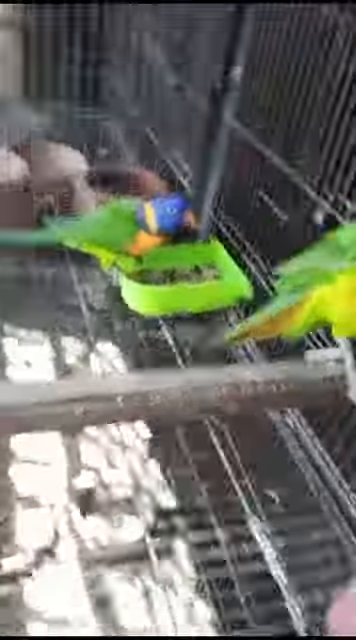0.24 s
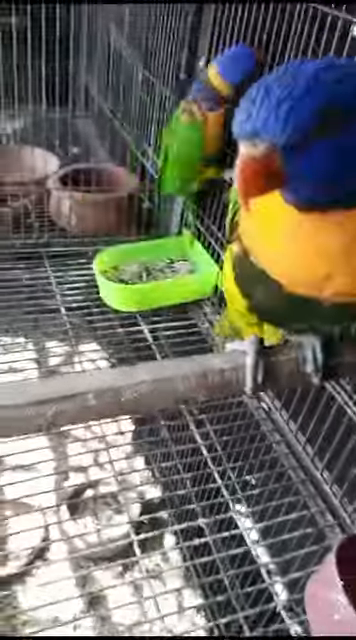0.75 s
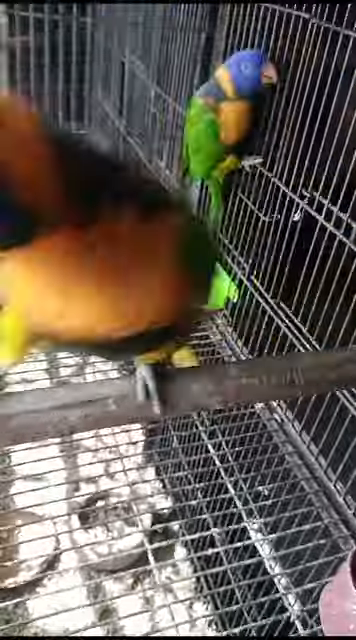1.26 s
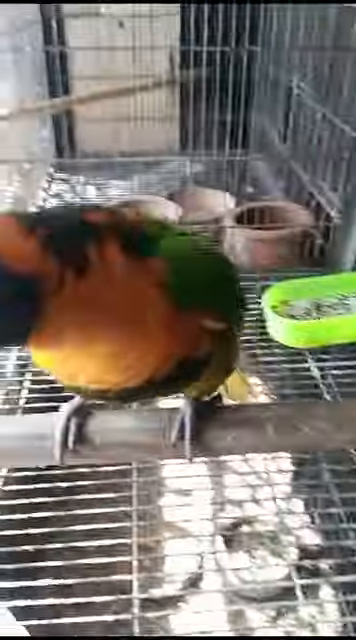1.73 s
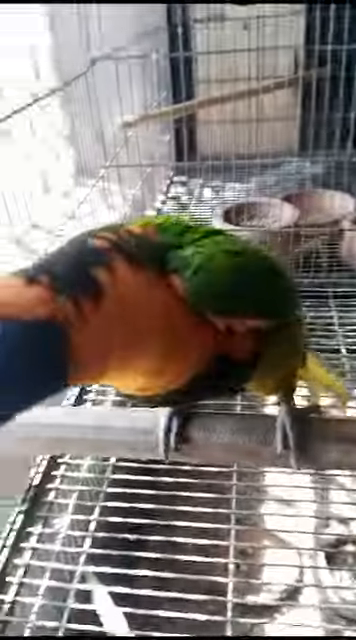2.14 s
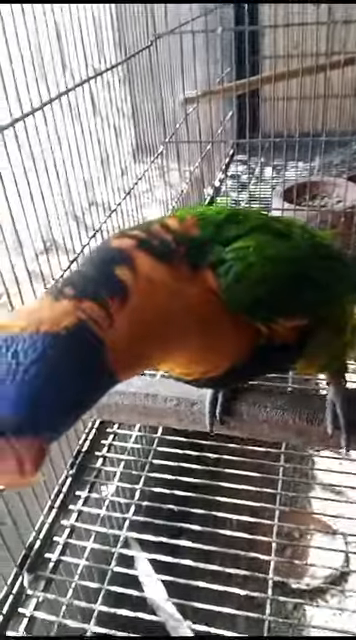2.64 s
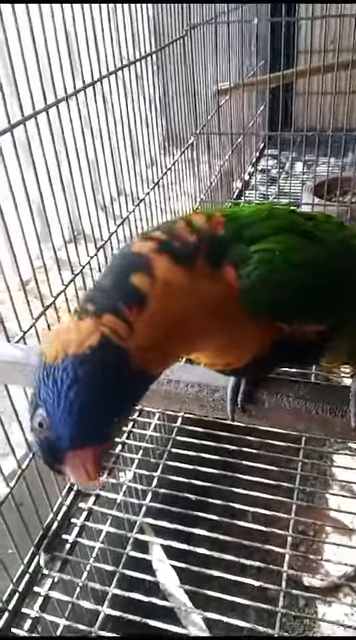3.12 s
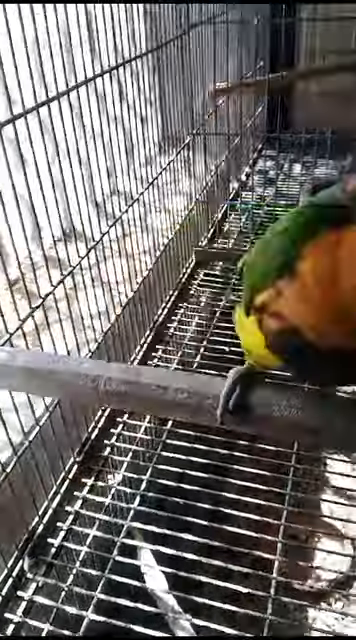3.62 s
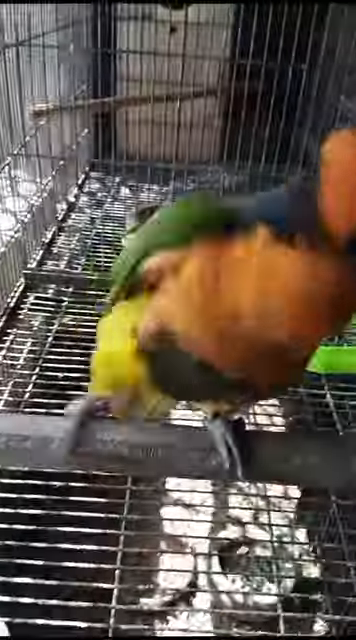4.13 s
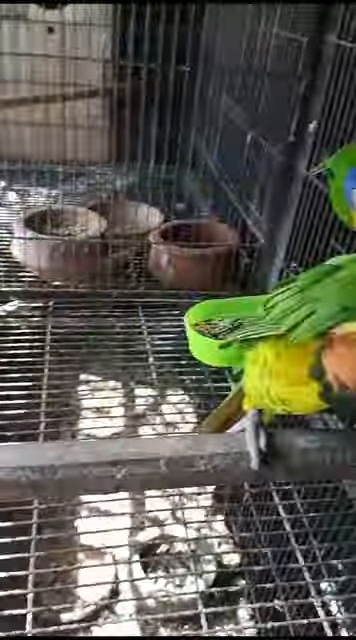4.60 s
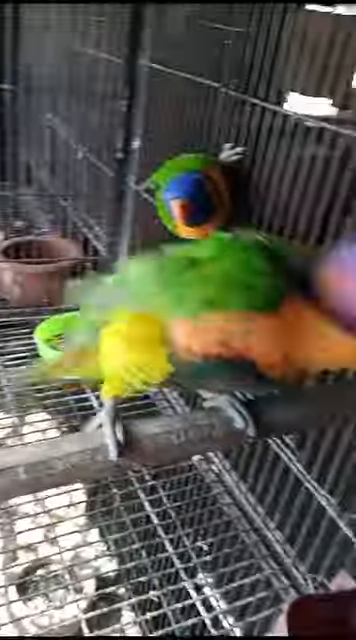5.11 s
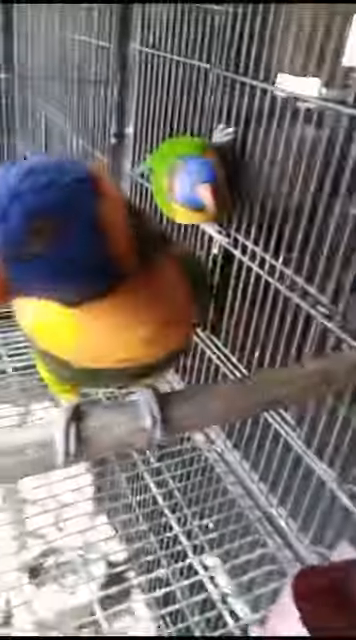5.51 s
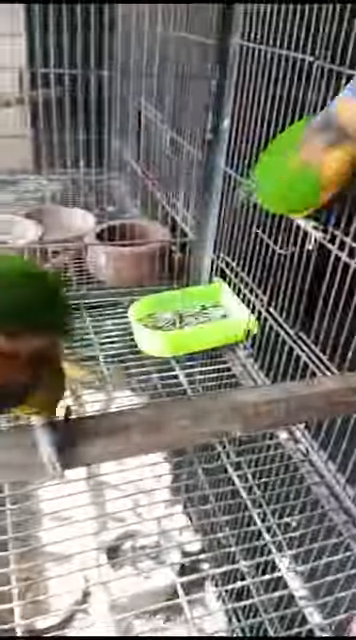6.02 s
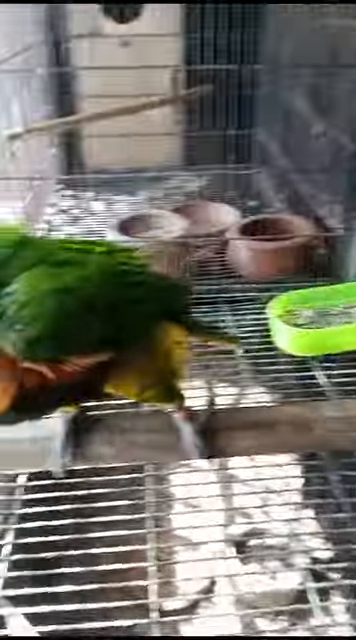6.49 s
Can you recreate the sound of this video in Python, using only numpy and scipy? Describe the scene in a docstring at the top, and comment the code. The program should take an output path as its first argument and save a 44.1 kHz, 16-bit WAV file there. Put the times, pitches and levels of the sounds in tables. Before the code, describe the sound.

Two close parrot voices, one lower and one higher, trade hoarse, fluttering squawks in a cage inside a hard-walled shed. Two piercing held whistles stand out early, the second followed by a run of short dry chirps. The squawking carries on, joined later by clear falling notes. Soft rustles of wings and feet, far-off birds and faint outdoor air lie underneath.

```python
"""Small parrots in a wire cage

Close to a phone: clear whistles (near-pure tones), rasping squawks from a low and a high voice
(fluttering harmonic stacks) and short dry chips. Wings and feet rustle on the wires; distant birds
call over faint yard air. A hard shed answers briefly; loud whistles overload the microphone."""
import sys
import numpy as np
from scipy import signal
from scipy.fft import rfft, irfft, next_fast_len
from scipy.io import wavfile
from scipy.ndimage import uniform_filter1d

SR = 44100
rng = np.random.default_rng(int(sys.argv[2]) if len(sys.argv) > 2 else 0)


def unload_audio(sound):
    """Save the sound as a 16-bit wav file, at the path given as the first command line argument."""
    columns = np.transpose(np.atleast_2d(sound))
    # keep every value between -1 and 1, then stretch to whole-number steps
    steps = np.round(np.clip(columns, -1, 1) * 32767)
    wavfile.write(sys.argv[1], SR, steps.astype(np.int16))


N = 297675
TOP_HZ = 15830


def amp(db):
    """dB to gain."""
    return 10 ** (np.asarray(db) / 20)


def unit(x):
    """Scale to rms 1."""
    return x / np.sqrt(np.mean(np.abs(x) ** 2) + 1e-20)


def along(points, hz):
    """Interpolate (freq_hz, value) points on a log axis."""
    freq_hz, values = np.transpose(points)
    return np.interp(np.log(hz + 1), np.log(freq_hz + 1), values)


def filtered(x, response):
    """Zero-phase filter with gain response(hz)."""
    size = next_fast_len(N + 8192)
    return irfft(rfft(x, size) * response(np.fft.rfftfreq(size, 1 / SR)), size)[..., :N]


def noise(spectrum):
    """Noise of rms 1 shaped by (freq_hz, gain_db) points."""
    return unit(filtered(rng.standard_normal(N), lambda f: amp(along(spectrum, f))))


def flutter(n, width_hz):
    """Complex low-pass noise, rms about 1."""
    hz = np.fft.fftfreq(next_fast_len(n + SR // 4), 1 / SR)
    white = rng.standard_normal(len(hz)) + 1j * rng.standard_normal(len(hz))
    return unit(np.fft.ifft(white / (1 + (hz / width_hz) ** 2) ** 2))[:n]


def contours(rows, edge_s):
    """(time_s, values...) rows to sample indices, edge fade and one smoothed curve per value."""
    time_s, *columns = np.transpose(rows)
    i = np.arange(max(round(time_s[0] * SR), 0), min(round(time_s[-1] * SR), N))
    fade = np.clip(np.minimum(i - i[0] + 1, i[-1] - i + 1) / (edge_s * SR), 0, 1)
    curves = [uniform_filter1d(np.interp(i / SR, time_s, c), size=440, mode="nearest") for c in columns]
    return i, fade, curves


def yard_air(level_db=-69, waver_db=4):
    """Distant flock and yard: faint wavering noise."""
    # freq_hz, gain_db
    spectrum = [(30, -18), (130, 0), (300, -4), (800, -14), (1500, -15), (3000, -13), (5000, -19),
                (8000, -36), (16000, -48)]
    return noise(spectrum) * amp(level_db + waver_db * flutter(N, 6).real)


def whistles(calls, step_db, slope_db, membrane_db, waver, membrane_hz=500):
    """Eight wavering partials; a slow second membrane adds sidebands to loud, high notes."""
    out = np.zeros(N)
    for rows in calls:  # time_s, pitch_hz, partial1_db, partial2_db, partial3_db
        i, fade, (hz, *levels_db) = contours(rows, edge_s=0.0027)
        phase = 2 * np.pi * np.cumsum(hz) / SR
        levels_db += [levels_db[2] + step_db + slope_db * k for k in range(5)]
        gate = np.clip((levels_db[1] + 17.5) / 6, 0, 1) * (hz > 2900)
        depth = gate * amp(membrane_db) * (1 + flutter(len(i), 12).real)
        membrane = depth * np.sin(2 * np.pi * membrane_hz * i / SR + 2.4 * flutter(len(i), 40).real)
        out[i] += fade * membrane * amp(levels_db[0] - 1)  # its own faint tone
        for k, db in enumerate(levels_db, 1):
            tone = (1 + waver * flutter(len(i), 38)) * np.exp(1j * k * phase)
            out[i] += np.sqrt(2) * fade * (1 + 2 * membrane) * amp(db) * tone.real * (k * hz < TOP_HZ)
    return out


def high_whistles(settle_s=0.026, held_db=(1, 5.5, -9.5), swell_db=(0, 4, -2)):
    """Upward swoop, loud held note and its faint echo in the shed; held_db, swell_db per partial."""
    # top_s, hold_end_s, top_hz, hold_first_hz, hold_last_hz, level_db, third_offset_db, echo_offset_db
    notes = [(0.062, .223, 3298, 3020, 2996, -22, 5, 5.1),
             (1.89, 2.081, 3200, 3008, 2927, -15.5, -3.5, -5.5)]
    # from_top_s, pitch_ratio, partial1_db, partial2_db, partial3_db (re note level)
    swoop = [(-.075, 0.56, -14.5, -16.5, -42.5), (-.038, 0.61, -4, -4.5, -19.5),
             (-.022, 0.8, -17.5, -13.5, -18), (-.011, .93, -7.5, 11, -27.5), (0, 0.97, 3.5, -1, -15)]
    # from_hold_end_s, partial1_db, partial2_db, partial3_db (re note level plus echo offset)
    echo_tail = [(.018, -17, -16, -50), (.055, -6.5, -8, -40.5), (.13, -17, -33.5, -66),
                 (.18, -53, -40, -80)]
    calls = []
    for top_s, end_s, top_hz, first_hz, last_hz, db, third_db, echo_db in notes:
        hold_db = db + np.add(held_db, [0, 0, third_db])
        rows = [(top_s + s, ratio * top_hz, *np.add(db, levels)) for s, ratio, *levels in swoop]
        rows += [(top_s + settle_s, first_hz, *hold_db), (end_s, last_hz, *(hold_db + swell_db))]
        rows += [(end_s + s, last_hz, *np.add(db + echo_db, levels)) for s, *levels in echo_tail]
        calls.append(rows)
    return whistles(calls, step_db=0, slope_db=-5.5, membrane_db=-24, waver=0.37)


def syllable(start_s, rise_s, length_s, first_hz, top_hz, last_hz, arch,
             peak_db, fade_db, peak_rasp, last_rasp, tilt_db_oct):
    """Hoarse scoop to top_hz, then a fading glide to last_hz; arch over 1 bends the pitch late."""
    attack_db, onset_rasp, hoarse_share = 15.5, 0.7, 0.37
    scoop = [(start_s + v * rise_s, first_hz + v * (top_hz - first_hz),
              peak_db - (1 - v ** 2) * attack_db, onset_rasp, tilt_db_oct) for v in (0, hoarse_share)]
    u = np.linspace(0, 1, num=8)
    time_s = start_s + rise_s + u * (length_s - rise_s)
    hz = top_hz + u ** arch * (last_hz - top_hz)
    db = peak_db - fade_db * u ** 1.58
    rasp = peak_rasp + (last_rasp - peak_rasp) * u ** 1.32
    return scoop + list(zip(time_s, hz, db, rasp, np.full_like(u, tilt_db_oct)))


def break_up(x, patchy_db):
    """The voice breaks up: random gain patches, about 500 Hz by 50 ms."""
    spectra = signal.stft(x, nperseg=512)[2]
    patches = uniform_filter1d(rng.standard_normal(spectra.shape), size=6, axis=0)
    patches = uniform_filter1d(patches, size=9, axis=1)
    return signal.istft(spectra * amp(patchy_db * unit(patches)), nperseg=512)[1][:N]


def squawks(syllables, throat, flutter_hz, tremble, jitter, jitter_hz, growl_db, patchy_db, steady=0.84):
    """Partials flutter, the higher the wilder; rasp shifts power to a torn stack with half-pitch growl."""
    out, harmonics = np.zeros(N), np.arange(1, 12)
    for row in syllables:
        i, fade, (hz, db, rasp, tilt_db_oct) = contours(syllable(*row), edge_s=0.0044)
        rasp = np.clip(rasp, 0, 1)
        wander = flutter(len(i), jitter_hz)
        pitch_ratios = 1 + np.array([tremble * np.sqrt(rasp) * wander.real, jitter * wander.imag])
        even, torn = np.exp(1j * np.pi * np.cumsum(hz * pitch_ratios, axis=1) / SR)  # half-pitch phasors
        tilt_db = tilt_db_oct * np.log2(harmonics[:, None])
        power = np.sum(amp(2 * (along(throat, harmonics[:, None] * hz) + tilt_db)), axis=0)
        for k in harmonics:
            shimmer = (steady / k + flutter(len(i), flutter_hz * k ** 0.62)) / np.hypot(1, steady / k)
            growl = rasp * amp(growl_db) * flutter(len(i), 420) * torn ** (2 * k - 1)
            hoarse = flutter(len(i), 200) * torn ** (2 * k) + growl
            partial = np.sqrt(1 - rasp ** 2) * shimmer * even ** (2 * k) + rasp * hoarse
            in_band = k * hz < SR / 2 - 3000
            out[i] += np.sqrt(2 / power) * fade * amp(db + tilt_db[k - 1]) * in_band * partial.real
    return break_up(filtered(out, lambda f: amp(along(throat, f))), patchy_db)


def far_voice():
    """Faint, distant squawks: some bright and hissy near 7 kHz, one dull."""
    # columns: arguments of syllable()
    syllables = [ (.265, 0.012, 0.19, 2437, 2403, 2337, .52, -37, 25, 0.39, 0.22, 7),
                 (2.056, 0.051, 0.1, 2265, 2105, 2160, 1.1, -45.5, 1.5, .7, .94, 4.9),
                 (4.252, .023, 0.078, 2364, 2406, 2338, 1.1, -34.5, 2, 0.19, 0.17, -0.2),
                 (5.45, .42, 0.7, 2277, 2450, 2507, 1.1, -54, 1.6, 0.72, 0.78, -7.1)]
    # freq_hz, gain_db
    throat = [(700, -42), (1300, -6.5), (2300, -2.5), (4500, 3.5), (6000, -9.5), (7200, 3.5), (8000, -18.5),
              (15000, -25.5)]
    return squawks(syllables, throat, flutter_hz=140, tremble=0.024, jitter=0.31, jitter_hz=138.3,
                   growl_db=2, patchy_db=-3.5)


def far_peeps(overtone_db=-20, edge_db=5.5):
    """Distant birds: thin unsteady glides with one overtone."""
    # start_s, length_s, first_hz, last_hz, peak_db
    peeps = [(0.399, 0.081, 1380, 1286, -54), (0.5, 0.11, 2630, 2930, -46), (0.498, 0.11, 3680, 4050, -50),
             (5.47, .11, 1774, 1540, -49.5), (5.799, 0.29, 1020, 1400, -58.5),
             (5.891, 0.053, 2480, 2450, -39.5)]
    out = np.zeros(N)
    for start_s, length_s, first_hz, last_hz, peak_db in peeps:
        rows = [(start_s, first_hz, peak_db - edge_db),
                (start_s + length_s / 2, (first_hz + last_hz) / 2, peak_db),
                (start_s + length_s, last_hz, peak_db - edge_db)]
        i, fade, (hz, db) = contours(rows, edge_s=0.0043)
        phasor = np.exp(2j * np.pi * np.cumsum(hz) / SR)
        tone = (0.63 + flutter(len(i), 64)) * phasor
        overtone = amp(overtone_db) * flutter(len(i), 77.6) * phasor ** 2
        out[i] += fade * amp(db) * (tone + overtone).real
    return out


def low_voice():
    """Close squawks near 2.2 kHz, strong in overtones."""
    # columns: arguments of syllable()
    syllables = [ (.545, .09, .16, 2213, 2373, 2230, 1.5, -30, 24, 0.58, 1, 0),
                 (.702, 0.15, .34, 1380, 2243, 2056, 0.61, -21, 30.8, 0.25, 0.89, -2.5),
                 (1.037, .07, 0.32, 1538, 2250, 1976, .9, -24.5, 19, 0.018, .75, -3),
                 (1.42, .06, 0.38, 1662, 2266, 1929, 1.1, -22, 10.4, 0.088, .5, 0),
                 (2.17, .022, .12, 2243, 2510, 2198, 0.78, -33, 16, .28, .6, -2),
                 (2.443, .025, .16, 2547, 2474, 2400, 2.1, -30, 24.5, 0.56, 1, 0),
                 (2.911, .075, 0.32, 2273, 2195, 2032, 0.82, -21.5, 10.7, 0.27, .7, -3),
                 (3.252, .034, 0.3, 2132, 2254, 2004, 0.8, -35, 17, .15, 1, 5.5),
                 (3.548, 0.0059, 0.087, 2384, 2500, 2560, 1.8, -34, 5.9, 1, 0.98, -0.5),
                 (3.62, .04, 0.14, 2145, 2063, 1954, 0.75, -24, 17, .57, 0.69, 3.5),
                 (3.853, .06, .21, 2150, 2355, 2073, 1.5, -23, 1.6, 0.012, 0.038, 1.3),
                 (4.049, 0.015, 0.12, 1965, 2030, 2114, 1.1, -24, 34.5, 0.22, .51, -0.3),
                 (4.31, .012, 0.16, 2030, 2081, 2056, 2.6, -31, 63, 0.17, 0.5, 2.5),
                 (4.431, .012, .053, 2317, 2462, 2140, .92, -27.5, 7.6, .13, 0.25, -5),
                 (4.5, 0.1, 0.21, 2370, 2520, 2516, 1.1, -33, 6.4, 0.42, 0.7, 5),
                 (4.751, .068, 0.26, 2290, 2120, 2088, 1.4, -33.5, 12, 1, 0.95, 2),
                 (4.97, 0.055, 0.33, 2160, 2235, 2010, 1.1, -23.5, 22, 0.043, 0.61, 0.5),
                 (5.288, .031, 0.23, 2564, 2550, 1870, 0.59, -42.5, 11, .12, 0.55, -4.2),
                 (6.2, .11, .225, 1750, 2400, 1483, 4.5, -24, 3, 0.027, .4, 2),
                 (6.422, 0.0089, .13, 1838, 1780, 1772, 1.1, -28, 9.1, 0.72, 1, -5),
                 (6.512, .05, .22, 2185, 2316, 1392, 2.3, -23.5, 4.4, 0.018, 0.43, -5)]
    # freq_hz, gain_db
    throat = [(600, -62), (900, -24), (1300, 3), (2200, 7.5), (3300, 12), (4300, 11), (5300, 4.5),
              (6300, 7.5), (7300, -3), (9000, -0.5), (10800, 0), (12700, -34), (15000, -11.5)]
    return squawks(syllables, throat, flutter_hz=105, tremble=0.0273, jitter=0.13, jitter_hz=150.9,
                   growl_db=2, patchy_db=4)


def rustle(rise_db=13, fall_db=18):
    """Wings and feet on the wires: short swells of low noise."""
    # peak_s, rise_s, fall_s, peak_db
    swells = [(.62, 0.056, .07, -48), (0.749, 0.071, 0.086, -42.5), (1.451, 0.2, 0.013, -54.5),
              (6.0, 0.29, 0.059, -62), (6.52, 0.069, 0.13, -56.5)]
    out = np.zeros(N)
    low = noise([(40, -93), (250, -5.5), (600, 1), (1200, -6), (3000, -34)])
    for peak_s, rise_s, fall_s, peak_db in swells:
        rows = [(peak_s - rise_s, peak_db - rise_db), (peak_s, peak_db),
                (peak_s + fall_s, peak_db - fall_db)]
        i, fade, (db,) = contours(rows, edge_s=0.0097)
        out[i] += fade * amp(db + 3 * flutter(len(i), 12).real) * low[i]
    return out


def high_voice():
    """Close squawks near 3.2 kHz, with more growl."""
    # columns: arguments of syllable()
    syllables = [ (1.038, .015, .1, 3113, 3190, 3220, 1.1, -27, 12, 0.69, .86, 0),
                 (1.129, 0.018, .12, 3120, 3417, 3358, 0.45, -25.5, 2.7, 0.019, .2, -2),
                 (1.239, 0.032, .22, 3055, 3026, 2798, .99, -24, 24, 0.5, 1, 1),
                 (1.602, 0.045, .2, 3317, 3250, 2893, 1.7, -35, 3.9, .39, 0.99, 5.8),
                 (3.248, 0.012, .27, 3396, 3307, 2774, 1.3, -22.5, 10.5, .12, 0.94, 0),
                 (3.57, 0.046, .14, 3200, 3286, 3360, 1.6, -30.5, 12, 0.7, .39, -2),
                 (3.692, 0.032, .13, 3464, 3306, 3210, .66, -27, 3.9, .01, .07, -10.5),
                 (3.861, 0.019, .06, 3112, 3170, 3363, .47, -29.5, 18, 1, 0.72, -1.7),
                 (4.669, .1, .28, 2923, 2853, 2940, 2.3, -30.5, 7.3, 0.72, .95, 2),
                 (4.999, 0.053, .27, 3210, 3387, 2747, 1.3, -25, 5, 0.15, 0.85, 4.5),
                 (5.291, .028, .14, 3210, 3020, 2147, 0.76, -29, 14, .44, 0.41, -4.5)]
    # freq_hz, gain_db
    throat = [(800, -30.5), (1600, -16.5), (2600, -1.5), (3400, -1.5), (5000, -8.5), (5900, 0.5),
              (6600, -17), (9500, -16.5), (12500, -32.5), (15500, -43)]
    return squawks(syllables, throat, flutter_hz=59, tremble=0.029, jitter=0.12, jitter_hz=154.4,
                   growl_db=6.5, patchy_db=3.5)


def chips(attack_s=0.0024, t60_s=0.037, drop=0.16, drop_s=0.01, gain_db=-2):
    """A few ms of voice: an abrupt falling stack, smeared by the nearest wires and walls."""
    # start_s, level_db, partial2_hz
    events = [(2.177, -21, 4240), (2.2744, -21, 4405), (2.3297, -33.5, 4750), (2.358, -26.5, 4700),
              (2.4011, -28.5, 5096), (2.6237, -28, 5040), (2.697, -30, 4870), (2.7728, -31, 5020),
              (2.853, -33.5, 4570), (4.178, -38.5, 4080), (4.2422, -41.5, 4640), (4.4567, -25.5, 4450)]
    # freq_hz, gain_db
    throat = [(1000, -16.5), (2400, -3), (4700, 10), (7000, -2), (10000, -12), (12500, -13), (15500, -22)]
    out, t = np.zeros(N), np.arange(SR // 10) / SR
    for start_s, level_db, partial2_hz in events:
        phase = np.pi * partial2_hz * np.cumsum(1 - drop * np.clip(t / drop_s, 0, 1)) / SR
        stack = sum((flutter(len(t), 730) * np.exp(1j * k * phase)).real for k in range(1, 8))
        envelope = amp(level_db + gain_db - 60 * t / t60_s) * (1 - np.exp(-t / attack_s))
        out[round(start_s * SR):][:len(t)] += envelope * stack
    return filtered(out, lambda f: amp(along(throat, f)))


def low_whistles():
    """Clear, mostly falling notes; overtones follow the beak's opening and the throat's colour."""
    # one list per note: time_s, pitch_hz, level_db, beak_open_db
    notes = [
        [(4.48, 2043, -21.5, -22), (4.51, 1948, -19.5, -8), (4.63, 1935, -21, -6), (4.7, 1863, -22.5, -4),
         (4.79, 1808, -19.5, -31), (4.84, 1802, -43, -12)],
        [(5.97, 1720, -50, -17.5), (6.026, 1660, -37, -24.5), (6.08, 1920, -37.5, -18)],
        [(6.085, 2158, -28, -15), (6.105, 2007, -25.5, 3.5), (6.122, 1807, -19.5, -6.5), (6.138, 1835, -25, -1),
         (6.163, 2030, -26.5, 5.5)],
        [(6.183, 2444, -13, -14), (6.203, 2104, -29, 11), (6.22, 2011, -25, 1.5), (6.245, 1903, -26.5, -2),
         (6.33, 1890, -24.5, -5.5), (6.4, 1818, -26.5, -1), (6.47, 1780, -33, -3)],
    ]
    # freq_hz, gain_db
    throat = [(3500, -9), (3800, 5.5), (4200, 3.5), (4800, -13), (5400, -4), (5900, 1.5), (6400, -5),
              (7300, -14)]
    calls = [[(s, hz, db, *(db + open_db + along(throat, hz * np.arange(2, 4))))
              for s, hz, db, open_db in rows] for rows in notes]
    return whistles(calls, step_db=-46.5, slope_db=-1, membrane_db=-90, waver=0.32)


def shed(x):
    """Hard walls: a short reverb in which each frequency dies at its own rate."""
    # freq_hz, t60_s
    decay = [(500, 0.037), (3000, 0.32), (12000, 0.0077)]
    hz, t, spectra = signal.stft(rng.standard_normal(SR // 2), SR, nperseg=256)
    tail = signal.istft(spectra * amp(-60 * t / along(decay, hz)[:, None]), SR, nperseg=256)[1]
    delayed = np.pad(x, (200, 0))
    return signal.fftconvolve(delayed, tail / np.linalg.norm(tail))[:N]


def scene():
    """Birds, shed reverb, air and rustle, in mono."""
    clear = high_whistles() + low_whistles()
    rough = low_voice() + high_voice() + far_voice()
    dry_chips = chips()
    reverb = shed(amp(-18) * clear + amp(-6.5) * rough + amp(-4.5) * dry_chips)
    return (clear + rough + dry_chips + reverb + far_peeps() + yard_air() + rustle())[None]


def record(dry):
    """The overloaded capsule rounds peaks and adds fuzz that grows steeply with power; hard band limit."""
    ceiling, highpass_hz = 0.75, 400
    power = uniform_filter1d(dry ** 2, size=600, axis=1)
    fuzz = amp(-26) * np.abs(power) ** 1.5 * noise([(30, -12), (500, 6), (16000, -13)])
    rounded = dry / (1 + np.abs(dry / ceiling) ** 6) ** (1 / 6)
    distortion = filtered(rounded - dry, lambda hz: hz ** 2 / (hz ** 2 + highpass_hz ** 2))
    return filtered(dry + distortion + fuzz, lambda hz: hz < TOP_HZ)


dry = scene()
out = record(dry)
unload_audio(out)
```